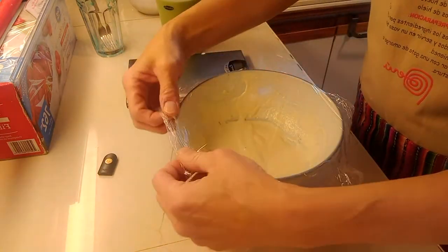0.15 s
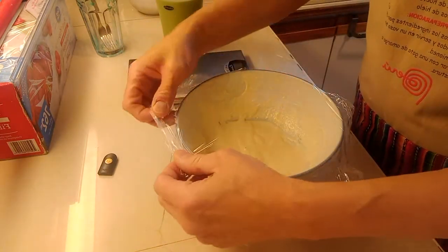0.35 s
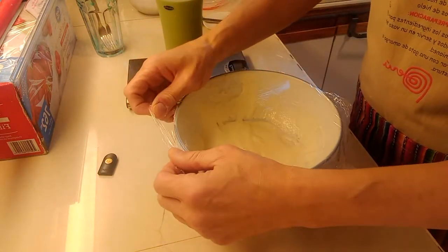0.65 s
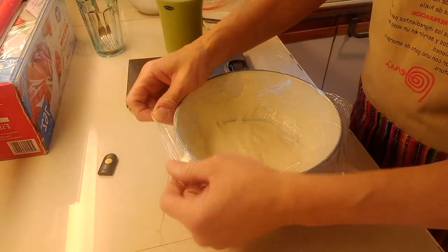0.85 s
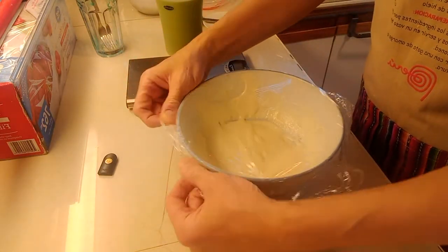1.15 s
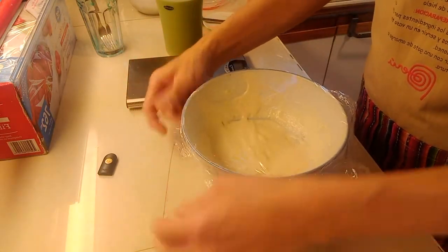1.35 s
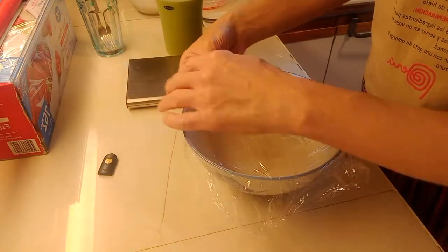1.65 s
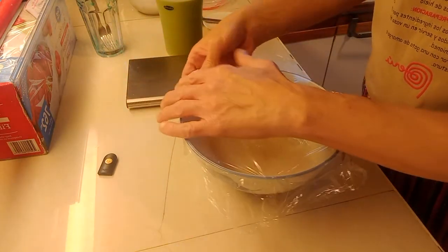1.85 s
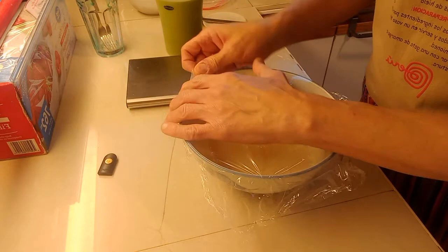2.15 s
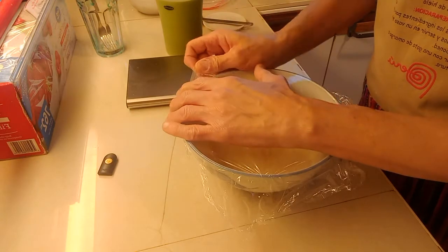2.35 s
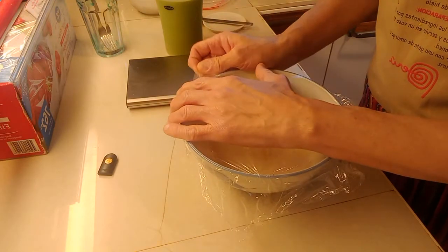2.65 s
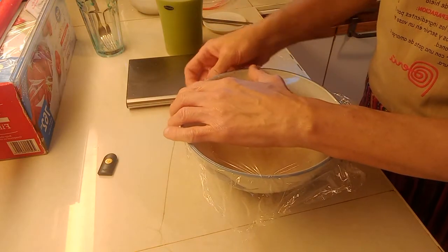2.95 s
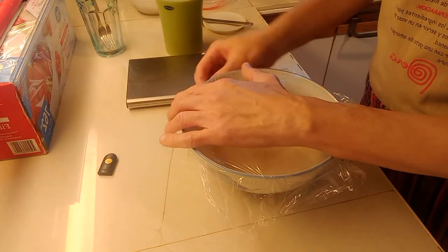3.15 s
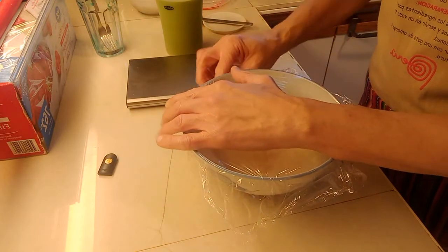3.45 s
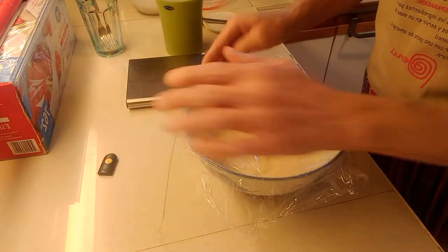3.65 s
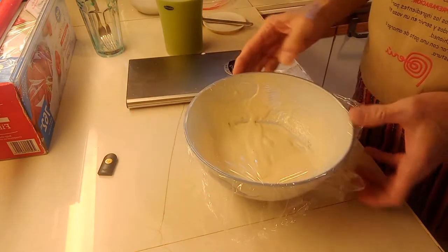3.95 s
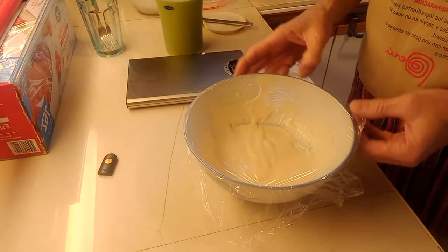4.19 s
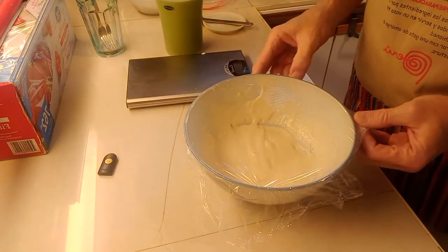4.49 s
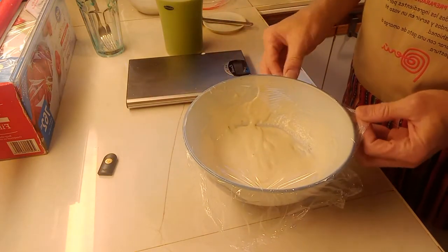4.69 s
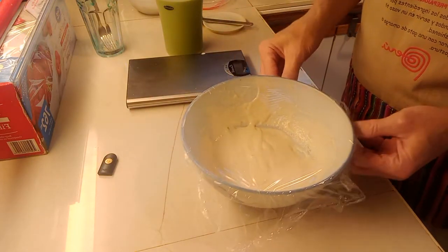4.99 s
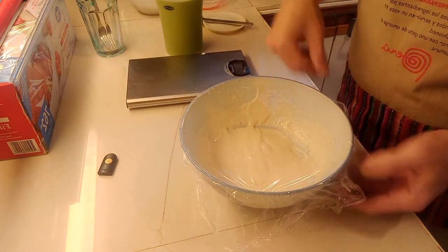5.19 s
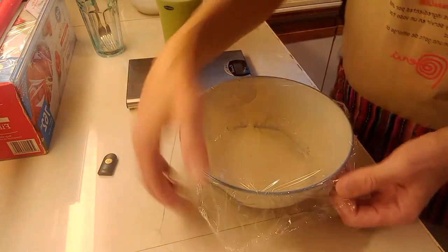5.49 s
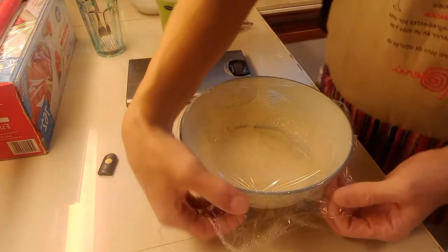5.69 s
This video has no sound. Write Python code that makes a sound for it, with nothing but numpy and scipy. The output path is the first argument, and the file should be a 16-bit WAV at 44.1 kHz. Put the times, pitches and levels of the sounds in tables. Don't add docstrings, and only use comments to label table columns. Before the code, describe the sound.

Hands stretch thin plastic over a bowl on a counter: irregular crackles, dry snaps, drum-like pops and brief rubbing squeaks, with soft low bumps from the bowl. After a quieter spell, one hollow thump rattles briefly; pressing the edge brings further crinkles and a cluster of hard snaps. It ends with loose film brushing across the counter. Close stereo pickup, short small-room reverberation, quiet fridge hum and hiss.

```python
import sys
import numpy as np
from scipy import signal
from scipy.fft import rfft, irfft, next_fast_len
from scipy.io import wavfile
from scipy.ndimage import uniform_filter1d, map_coordinates

SR = 44100
rng = np.random.default_rng(int(sys.argv[2]) if len(sys.argv) > 2 else 0)


def to_wav(sig):
    pcm = np.clip(np.atleast_2d(sig), -1, 1) * 32767
    pcm = np.round(pcm).astype(np.int16)
    wavfile.write(sys.argv[1], SR, pcm.T)


def invert_db(x):
    u = np.asarray(x, float) / 20
    return 10 ** u


N = 257103

# t/s, crinkle level/dB, build/s, ease/s, sheet over crinkle/dB
STRETCH = [(.11, -62.5, 0.13, 0.15, -6.5), (.235, -48, 0.059, 0.11, -3.5), (0.368, -46, 0.13, 0.06, 0),
           (0.567, -53, 0.15, 0.081, -1), (0.913, -55.5, 0.01, 0.4, 1), (1.04, -54, 0.14, 0.18, -1.5),
           (1.17, -48.5, 0.038, 0.041, -18), (1.32, -47.5, 0.015, 0.043, -8), (1.36, -54, 0.1, 0.11, 3),
           (1.419, -45, 0.17, 0.05, -4.5), (1.52, -62.5, 0.036, 0.31, -12), (1.8, -54.5, 0.083, 0.46, -10),
           (1.875, -47, 0.017, 0.033, -2), (1.93, -51.5, .05, 0.051, -5), (1.959, -52.5, 0.011, 0.056, 0.5),
           (2.09, -54.5, 0.093, 0.14, -2.5), (2.174, -43, 0.03, 0.031, -2.5),
           (2.222, -45.5, 0.012, .03, 11), (2.243, -38, 0.036, 0.018, 3), (2.28, -45.5, 0.027, 0.033, -4.5),
           (2.35, -48.5, 0.046, 0.034, 0), (2.41, -54, 0.05, 0.056, 6.5), (2.436, -47, 0.019, 0.044, 3),
           (2.52, -50, 0.11, 0.23, -21), (2.556, -47.5, 0.027, 0.04, 9.5), (2.66, -59, 0.095, 0.25, 0)]
TUCK = [(2.912, -54, 0.083, 0.22, -7.5), (3.256, -47.5, 0.087, 0.12, -6), (3.51, -52, 0.18, 0.21, -6),
        (3.698, -63.5, 0.011, 0.027, 24), (3.8, -58, 0.056, 0.038, -17), (3.9, -50, 0.023, 0.022, -2.5),
        (3.983, -45, 0.015, 0.049, -1.5), (4.033, -47.5, 0.039, 0.04, -1.5), (4.08, -58, 0.018, 0.085, -31),
        (4.29, -57.5, 0.041, 0.43, -17), (4.358, -53, 0.24, 0.025, -16), (4.53, -52, 0.046, 0.26, -10),
        (4.6, -58, 0.022, 0.012, 1), (4.65, -49, 0.017, 0.13, -26), (4.709, -45.5, 0.054, 0.048, 1),
        (4.742, -40, 0.016, 0.07, 3), (4.966, -37.5, 0.097, 0.056, -8.5), (5.081, -44.5, 0.2, 0.053, -7),
        (5.174, -49.5, 0.04, 0.051, 4), (5.43, -62, 0.017, 0.09, -3), (5.49, -54.5, 0.035, 0.12, 0),
        (5.82, -62.5, 0.028, 0.064, -28)]
# f/Hz, density level/dB
FILM = [(2200, -38), (3500, -6), (4200, -5.5), (6000, -6.5), (7000, -2), (7800, -1), (8600, -5),
        (10100, -7), (12000, -2), (14400, -3.5), (15800, -3.5), (16500, -54)]
FOLDS = [(1100, -17), (1800, -12.5), (2600, -6.5), (3300, -8), (4200, -4.5), (6500, -5.5), (10000, -9)]
SHEET = [(290, -27), (500, -6.5), (727, -4.5), (909, -5), (1520, -5.5), (1900, -6.5), (2470, -10.5),
         (4180, -120)]
# f/Hz, correlation/1
FILM_ALIKE = [(300, 0.85), (1000, 0.49), (2500, 0.3), (5000, 0.083), (9000, 0.053), (15000, 0.05)]


def crinkle():
    s, peak_db, build, ease, sheet_db = np.transpose(STRETCH + TUCK)
    db = swells(s, peak_db, build, ease)
    slowness = 0.74
    body_db = swells(s, peak_db + sheet_db, slowness * build, slowness * ease)
    folds_db = 24.5 + 0.59 * db + 0.83 * body_db
    fine = ticks(spread_db=3.5, clump_db=1.5, t60=0.02, count=5500)
    coarse = ticks(spread_db=14.5, clump_db=4.0, t60=0.097, count=1200)
    top = invert_db(db + 1.0) * fine * uneven(hiss(FILM, FILM_ALIKE), patchy_db=-0.5)
    folds = invert_db(folds_db) * fine ** 0.023 * coarse ** 0.058 * uneven(hiss(FOLDS, FILM_ALIKE), patchy_db=4.0)
    sheet = invert_db(body_db - 1.5) * fine ** 0.2 * coarse ** 0.33 * hiss(SHEET, FILM_ALIKE)
    return top + folds + sheet


# t/s, peak level/dB
CRACKS = [(0.116, -34), (.166, -36), (0.2162, -25.5), (0.234, -38), (.2542, -28), (0.307, -23),
          (0.373, -43), (0.888, -33.5), (1.088, -39.5), (1.199, -34), (1.2782, -32), (1.331, -27),
          (1.353, -42), (0.427, -40), (3.245, -49), (3.33, -31), (3.609, -31), (4.721, -26), (4.913, -22),
          (1.483, -35), (1.752, -38), (1.867, -32), (1.876, -28), (1.922, -29), (1.954, -19.5),
          (2.118, -19), (2.1994, -22), (2.2744, -26), (2.7543, -27.5), (3.154, -34.5), (3.208, -31),
          (3.4307, -38), (3.97, -31), (4.0295, -22.5), (.493, -37), (0.53, -30), (.85, -60), (1.9, -36),
          (2.3, -36), (4.155, -46), (4.261, -38), (4.349, -37), (4.429, -34), (4.506, -33.5), (4.597, -44),
          (4.959, -28), (4.9726, -46)]
# t/s, peak level/dB, pop level/dB
THUDS = [(0.0456, -39, -24), (.195, -47, -4), (.3384, -34.5, -11), (0.458, -29, -13), (0.5079, -26, -20),
         (.5591, -29.5, -8), (.9732, -33, -14), (1.0384, -44.5, 0), (1.3533, -36, -6), (2.08, -46, 9),
         (2.095, -48, 3), (2.2435, -29, -14), (2.5014, -28.5, -12), (2.5541, -24, -1.5),
         (3.6884, -29.5, 3.5), (4.7265, -30, -31), (4.7317, -14, -17), (4.7344, -17.5, -14.5),
         (4.749, -35, -23), (4.765, -23.5, -7), (4.7564, -27, -7)]
# t/s, peak level/dB, pop level/dB, pop f/Hz
POPS = [(0.29, -19.5, -29, 3300), (0.364, -28, -15, 1450), (0.9213, -21.5, -21, 1590),
        (1.026, -20, -18.5, 1370), (1.2362, -59.5, 11.5, 1090), (1.2786, -44, 14, 2030),
        (1.3058, -40, 2, 1230), (1.3178, -21, -10.5, 2040), (.976, -37, -8, 1200), (2.933, -46, -4.5, 1100),
        (3.272, -39.5, 0.5, 1370), (3.478, -44.5, -4, 1150), (5.026, -42, -1, 1500),
        (2.171, -17, -11.5, 2460), (2.216, -33, -14, 1510), (2.2258, -18.5, -8, 1550),
        (2.2358, -22, 1, 2900), (2.246, -19, -2, 2610), (2.409, -37, 1, 1720), (2.2, -39, -15, 1300),
        (2.184, -25, -0.5, 2980), (2.286, -29.5, -3.5, 2560), (2.344, -30, -8, 1340),
        (2.358, -20.5, -18, 1910), (2.432, -22.5, 1.5, 1423), (2.5224, -30, -10, 1500),
        (2.5577, -29.5, 3, 1480), (2.65, -33, -8, 2470), (2.7055, -38.5, -2, 1080), (2.785, -34, -8, 1280),
        (3.979, -23, -21, 1230), (4.0, -38, 0, 1320), (4.031, -26.5, -15.5, 1090),
        (4.679, -33.5, -5.5, 1500), (4.7886, -17, -19, 1093), (5.0688, -19.5, -13.5, 1400),
        (5.168, -28, -12, 1440), (5.436, -32, -15, 2000), (1.3163, -47, -3, 1150),
        (2.1723, -41.5, 6.5, 1500), (2.241, -29.5, 2, 1500), (4.7313, -19, -5, 4420),
        (4.7346, -23, -5, 3700), (4.719, -40, 3, 3930), (0.256, -29, -17, 1500), (0.354, -26, -17, 1060),
        (2.119, -40.5, 3, 2280), (2.3592, -39, 0, 1750), (2.5535, -33.5, 6.5, 780)]


def snap_rows():
    dry_snaps = [(*row, -31.5, 1500, 0.046, 3.2) for row in CRACKS]
    drummed = [(*row, 765, 0.029, 1) for row in THUDS]
    patches = [(*row, 0.02, 1) for row in POPS]
    return dry_snaps + drummed + patches


def snaps():
    t, rows = np.arange(SR // 10) / SR, snap_rows()
    room = ((0, 0), (0, len(t)))
    crack = uneven(hiss(FILM, FILM_ALIKE) + 0.81 * hiss(FOLDS, FILM_ALIKE), patchy_db=4.5)
    crack, body = np.pad(crack, room), np.pad(hiss(SHEET, FILM_ALIKE), room)
    sudden = 1 - np.exp(-t / 0.0006)
    pop_rise = 1 - np.exp(-t / 0.00013)
    out = np.zeros(crack.shape)
    for (s, db, pop_db, hz, t60, onset), chance in zip(rows, rng.standard_normal((len(rows), 4, 2, 1))):
        now = slice(round(s * SR), round(s * SR) + len(t))
        ring = 0
        for c in chance:
            detune = 1 + 0.031 * (c[0] - chance[:, 0].mean())
            ring = ring + np.sin(2 * np.pi * hz * detune * t + 0.8 * c[::-1])
        out[:, now] += invert_db(db - 13.0 - 60 * t / t60) * sudden ** onset * crack[:, now]
        pop_fade = invert_db(db + pop_db - 12.5 - 60 * t / (1.73 * t60))
        out[:, now] += pop_fade * pop_rise * (0.63 * body[:, now] + 0.81 * ring)
    return out[:, :N]


# t/s, level/dB, build/s, ease/s, f/Hz
SQUEAKS = [(.238, -56, .012, .015, 850), (.27, -59, .06, .06, 390), (.34, -56, .04, .025, 780),
           (.37, -53, .03, .025, 430), (0.477, -56, .02, 0.024, 300), (.48, -58, .03, .04, 600),
           (1.0, -67, .03, .08, 1300), (1.165, -58.5, .04, .02, 4300), (1.2, -62, 0.053, 0.025, 1680),
           (1.368, -46.5, .008, .022, 330), (1.392, -49, .012, 0.022, 240), (1.405, -58, .02, .012, 820),
           (1.43, -63, .02, .03, 230), (2.09, -52, 0.0072, 0.039, 500), (2.27, -54, .04, .03, 760),
           (2.28, -55, .05, .022, 2600), (2.565, -49, .015, .04, 740), (2.575, -51, .015, .03, 530),
           (3.9, -58.5, 0.011, 0.023, 300), (4.01, -64, 0.035, .04, 1150), (4.58, -64, .03, .03, 200),
           (4.92, -57, 0.02, 0.07, 1450), (5.27, -65, 0.062, 0.039, 900), (5.3, -73, 0.17, .2, 1990),
           (5.33, -79, 0.089, .15, 1400), (5.38, -71, 0.073, 0.11, 2050), (5.495, -55, .008, 0.07, 440),
           (5.5, -63, .015, .03, 4600), (5.6, -67, 0.072, 0.09, 900), (5.76, -70, .08, .15, 700),
           (5.64, -65, 0.13, 0.085, 1530)]


def squeaks():
    t, out = np.arange(N) / SR, np.zeros(N)
    width_hz = 220
    fuzz = unit(wobble(width_hz)) + 1j * unit(wobble(width_hz))
    for s, db, build, ease, hz in SQUEAKS:
        now = slice(*np.searchsorted(t, [s - 5 * build, s + 5 * ease]))
        fall_db = 12 * np.maximum((t[now] - s) / ease, (s - t[now]) / build)
        out[now] += invert_db(db - fall_db) * np.real(fuzz[now] * np.exp(2j * np.pi * hz * t[now]))
    return out


# t/s, left-right level/dB
SIDE_OF_RIM = [(0, 1.5), (1.2, 1.5), (2.3, 1), (3.3, 2), (3.9, 0.5), (4.7, -0.5), (5.0, 1), (5.83, -4)]
# t/s, delay of the film at the left port/samples
LEFT_LATE = [(0, -6), (3.6, -6), (3.9, 4), (5.83, 4)]


def placed(x):
    delay = np.round(curve(LEFT_LATE)).astype(int)
    late = np.clip(np.arange(N) - delay, 0, N - 1)
    return np.array([x[0][late], x[1]]) * invert_db(np.outer([0.5, -0.5], curve(SIDE_OF_RIM)))


# t/s, peak level/dB, second ring (counter) level/dB, third ring (rim) level/dB
BUMPS = [(0.204, -52, -10, -14), (0.358, -45.5, -21, 18), (.403, -63, 11, -10), (0.466, -50, -21, 18),
         (1.359, -42, -17, 11.5), (2.09, -52.5, 8, 21), (2.389, -47.5, -24, 12.5), (2.55, -46, -15, 20),
         (3.209, -47.5, -1, 18), (3.89, -47.5, -26, 17), (4.116, -54.5, 14.5, 20), (4.126, -62, 25, 0),
         (4.669, -50.5, -33, 21.5), (4.733, -49, -25, -13), (5.082, -45.5, -23, -18), (5.183, -43, -26, -1),
         (5.485, -59, -20, 29)]
# f/Hz, t60/s
BOWL = [(173.2, 0.16), (73, 0.11), (373, 0.022)]


def bumps():
    t, out = np.arange(SR // 3) / SR, np.zeros((2, N + SR))
    rise = (1 - np.exp(-t / 0.0074)) ** 2
    for (s, db, *rel_db), chance in zip(BUMPS, rng.standard_normal((len(BUMPS), 6))):
        for (hz, t60), extra_db, off, turn in zip(BOWL, [0, *rel_db], chance, chance[3:]):
            port_phase = [[0], [0.15 * turn]]
            ring = np.sin(2 * np.pi * hz * (1 + 0.045 * off) * t + port_phase)
            out[:, round(s * SR):][:, :len(t)] += invert_db(db + extra_db + 5.0 - 60 * t / t60) * rise * ring
    return out[:, :N]


# t/s, peak level/dB
KNOCK = [
    (3.6895, -23),
]
# delay/s, air level/dB, ring level/dB
LANDINGS = [
    (0, 0.5, -0.5),
    (.0075, -9.5, -8.5),
    (0.0205, -8, -5.5),
    (0.028, -14, -8),
    (.046, -13.5, -21),
]
# f/Hz, level/dB, t60/s
HOLLOW = [(90, 6.5, 0.088), (168, -17, 0.16), (371, -9.5, 0.19), (488, -8.5, 0.15), (633, -15, 0.23),
          (721, -4, 0.12), (803, -19, 0.2), (987, -21, 0.16), (1090, -11.5, 0.12), (290, -12.5, 0.12),
          (1530, -24.5, 0.22), (2030, -27.5, 0.17), (2310, -21.5, 0.098), (2557, -29, 0.091)]
# f/Hz, density level/dB
KNOCK_AIR = [(35, -40), (60, -34), (100, -7.5), (400, -9), (800, -8.5), (1500, -15.5), (3000, -23.5),
             (9000, -47), (15000, -50)]


def knock():
    (s, db), t, out = KNOCK[0], np.arange(SR // 3) / SR, np.zeros((2, N + SR))
    later, air_db, ring_db = np.transpose(LANDINGS)
    for (hz, level_db, t60), turn in zip(HOLLOW, rng.uniform(0, 2 * np.pi, (len(HOLLOW), 2, 1))):
        fade = invert_db(db + level_db - 3.5 - 60 * t / t60) * (1 - np.exp(-t * hz * hz / 250))
        port_phase = min((hz / 520) ** 3, 0.6) * turn
        for wait, again_db in zip(later, ring_db):
            ring = np.sin(2 * np.pi * hz * (t + wait) + port_phase)
            out[:, round((s + wait) * SR):][:, :len(t)] += invert_db(again_db) * fade * ring
    air = dying(s + later, invert_db(db - 6.5 + air_db), rise=0.0003, t60=0.22) * hiss(KNOCK_AIR)
    return out[:, :N] + air


# t/s, counter rumble level/dB, bowl rub level/dB, ease/s
GRIPS = [(.22, -56.5, -57, 0.19), (.39, -54, -55.5, 0.16), (.52, -76, -60, 0.097), (.93, -62, -73, 0.092),
         (1.09, -62, -62.5, 0.32), (1.36, -48.5, -50.5, 0.042), (1.8, -69, -69.5, 0.65),
         (2.093, -50, -45, 0.038), (2.2, -54, -57.5, 0.12), (2.412, -52, -48.5, 0.11),
         (2.568, -60, -45, 0.055), (2.3, -67, -70, 0.055), (2.84, -55.5, -65.5, 0.13),
         (3.02, -66, -74, 0.22), (3.22, -54, -53.5, 0.13), (3.55, -71, -62, 0.33),
         (3.72, -31.5, -44, 0.036), (3.9, -61, -59.5, 0.24), (4.14, -56, -64, 0.13), (4.45, -65.5, -73, 1),
         (4.77, -69, -60.5, 0.31), (5.11, -58, -56.5, 0.18), (5.197, -66, -44, 0.064),
         (5.54, -57, -57, 0.31)]
# f/Hz, density level/dB
COUNTER = [(35, -25), (58, 0.5), (95, -2), (140, -1.5), (200, -69)]
RUB = [(130, -15.5), (180, -6), (270, -6), (380, 0), (520, -14.5), (800, -23.5)]


def hands():
    s, *peaks_db, ease = np.transpose(GRIPS)
    counter_db, rub_db = [swells(s, db, 0.47 * ease, ease) for db in peaks_db]
    shake, drag = 2.5 * wobble(14), 1.8 * wobble(30)
    rumble = invert_db(counter_db - 5.0 + shake) * hiss(COUNTER)
    rub = invert_db(rub_db - 1.5 + drag) * hiss(RUB)
    return (rumble + rub) * hush([KNOCK[0][0]], depth_db=-7, lead=0.015)


# t/s, level/dB, build/s, ease/s
SWEEP = [
    (5.44, -54.5, 0.031, 0.13),
    (5.495, -52.5, 0.055, 0.14),
    (5.56, -53, 0.11, 0.1),
    (5.635, -51.5, 0.21, 0.063),
    (5.72, -69.5, .1, 0.19),
]
# t/s, level/dB, build/s, ease/s
SLEEVE = [(0.068, -66.5, 0.017, 0.31), (0.524, -55.5, 0.04, 0.074), (1.3, -94.5, 0.13, 0.22),
          (3.1, -79.5, 0.24, 0.18), (3.8, -73, 0.13, 0.09), (4.298, -68, 0.09, 0.14),
          (4.58, -63, 0.06, 0.023), (5.3, -73, 0.2, 0.32), (4.87, -64, .06, 0.054),
          (1.23, -71, 0.035, 0.063)]
# f/Hz, density level/dB
DRAGGED = [(250, -28), (450, -3), (640, -5.5), (900, -7.5), (1600, -7), (2200, -8), (5000, -13),
           (9000, -24)]
CLOTH = [(350, -47), (600, 7.5), (1000, 3), (1600, 8.5), (1850, -40)]


def sweep():
    drag = invert_db(swells(*np.transpose(SWEEP)) + 0.56 * wobble(43)) * uneven(hiss(DRAGGED), patchy_db=0.9)
    brush = invert_db(swells(*np.transpose(SLEEVE)) + 1.8 * wobble(20)) * hiss(CLOTH + [(2600, -120)])
    return drag + brush


# f/Hz, t60/s
WALLS = [(150, 0.33), (1000, 0.17), (4000, 0.11), (14000, 0.0086)]


def walls(x):
    hz, t, z = signal.stft(rng.standard_normal((2, SR // 3)), SR, nperseg=256)
    tail = signal.istft(z * invert_db(-60 * t / along(WALLS, hz)[:, None]), SR, nperseg=256)[1]
    tail = tail / np.linalg.norm(tail[0])
    delayed = np.pad(x, ((0, 0), (130, 0)))
    return signal.fftconvolve(delayed, tail, axes=1)[:, :N]


# f/Hz, density level/dB
KITCHEN = [(15, -58), (25, -47), (70, 3.5), (80, -5.5), (101, 2), (140, -12.5), (169, -7), (253, -14),
           (306, -9.5), (390, -5.5), (471, -11), (1000, -27), (2300, -52), (3500, -27), (7340, -23),
           (15600, -33)]


def drone():
    sway_db = 1.2 * wobble(3) + 1.2 * wobble(12)
    return invert_db(-67 + sway_db) * hiss(KITCHEN)


# f/Hz, correlation/1
ALIKE = [(40, 0.44), (130, 0.79), (200, 0.72), (330, 0.32), (640, 0.76), (1400, 0.12), (3000, -0.18),
         (6000, -0.05), (15000, 0.22)]
# f/Hz, left-right level/dB
EARS = [(100, 0.2), (400, -4), (1400, -0.7), (5000, -0.5), (9000, 1.5), (15000, 3.5)]


def hiss(spectrum, alike=ALIKE):
    m = next_fast_len(N + 8192)
    hz = np.fft.rfftfreq(m, 1 / SR)
    turn = np.arccos(np.clip(along(alike, hz), -1, 1)) / 2
    mid, side = rfft(rng.standard_normal((2, m))) * [np.cos(turn), np.sin(turn)]
    lean = invert_db(np.outer([0.5, -0.5], along(EARS, hz)))
    return unit(irfft(np.array([mid + side, mid - side]) * lean * invert_db(along(spectrum, hz)), m)[:, :N])


def uneven(x, patchy_db):
    z = signal.stft(x, nperseg=128)[2]
    field = uniform_filter1d(rng.standard_normal(z.shape[1:]), size=4, axis=0)
    field = uniform_filter1d(field, size=3, axis=1)
    return unit(signal.istft(z * invert_db(patchy_db * unit(field)), nperseg=128)[1][:, :N])


def ticks(spread_db, clump_db, t60, count):
    when, size = rng.random((count, 2)).T
    clumps = clump_db * wobble(35)[(when * N).astype(int)]
    gains = invert_db(-spread_db * np.log(size + 1 / 60) + clumps)
    env = dying(when * (N - 1) / SR, gains, rise=0.0001, t60=t60)
    return env / np.sqrt(np.abs(uniform_filter1d(env ** 2, SR // 8)) + 1e-12)


def dying(times, gains, rise, t60):
    t = np.arange(SR // 3) / SR
    kicks = np.bincount(np.round(np.asarray(times) * SR).astype(int), np.asarray(gains) ** 2, N)[:N]
    fade = invert_db(-60 * t / t60) * (1 - np.exp(-t / rise))
    return np.sqrt(np.abs(signal.fftconvolve(kicks, fade ** 2)[:N]))


def swells(s, db, build, ease):
    after = np.arange(0, N + 64, 64) / SR - np.c_[s]
    fall_db = 12 * np.maximum(after / np.c_[ease], -after / np.c_[build])
    power = invert_db(np.c_[db] - fall_db) ** 2
    return np.interp(np.arange(N) / SR, after[0] + s[0], 10 * np.log10(power.sum(axis=0) + 1e-12))


def hush(times, depth_db, lead):
    t = np.arange(N) / SR
    ahead = np.append(times, 99)[np.searchsorted(times, t)] - t
    return invert_db(-depth_db * np.exp(-(ahead / lead) ** 2))


def wobble(rate):
    return map_coordinates(rng.standard_normal(int(N * rate / SR) + 4), [np.arange(N) * rate / SR])


def curve(rows):
    s, value = np.transpose(rows)
    return np.interp(np.arange(N) / SR, s, value)


def along(points, hz):
    f, v = np.transpose(points)
    return np.interp(np.log(hz + 1), np.log(f + 1), v)


def unit(x):
    return x / np.sqrt(np.mean(x ** 2) + 1e-20)


def scene():
    taut = hush(sorted(row[0] for row in THUDS + POPS), depth_db=5, lead=0.015)
    film = placed(taut * crinkle() + snaps() + squeaks())
    echo = invert_db(-10) * walls(film)
    return film + echo + bumps() + knock() + hands() + sweep() + drone()


def roll_off(x):
    return signal.sosfilt(signal.butter(12, 16780, fs=SR, output="sos"), x)


def record(dry):
    hz = np.fft.rfftfreq(N, 1 / SR)
    low_cut_hz = 36
    response = (hz < 15950) / (1 + (low_cut_hz / (hz + 1)) ** 4)
    mix = irfft(rfft(dry) * response, N)
    return roll_off(mix)


dry = scene()
out = record(dry)
to_wav(out)
```